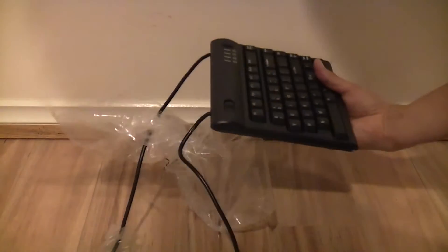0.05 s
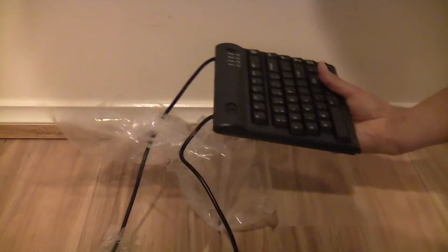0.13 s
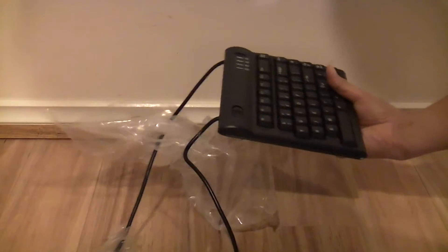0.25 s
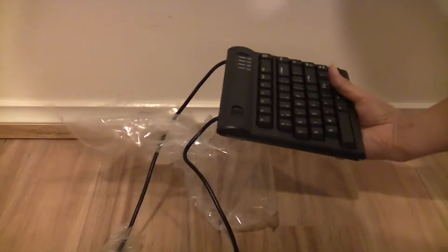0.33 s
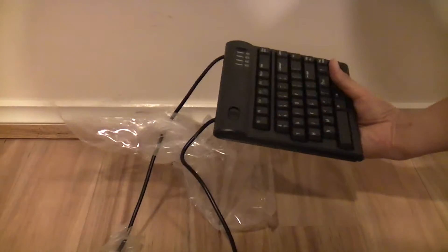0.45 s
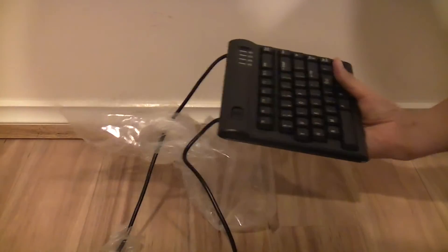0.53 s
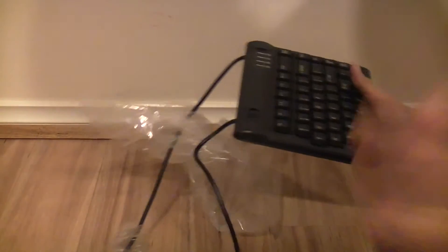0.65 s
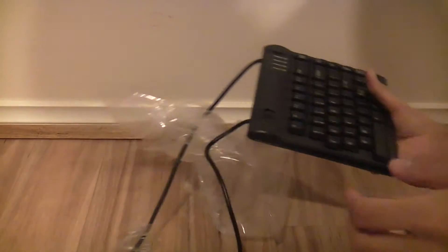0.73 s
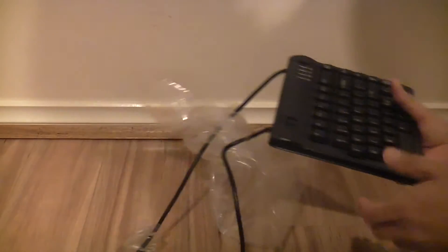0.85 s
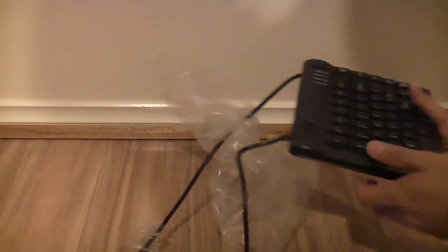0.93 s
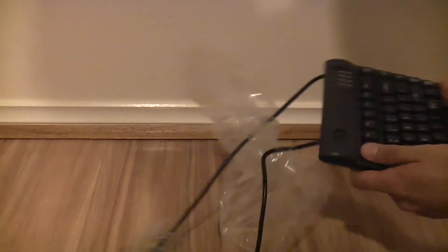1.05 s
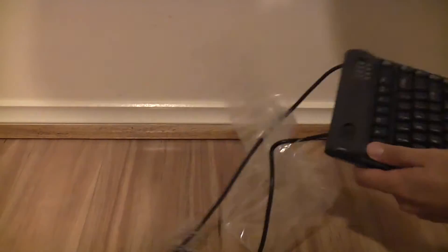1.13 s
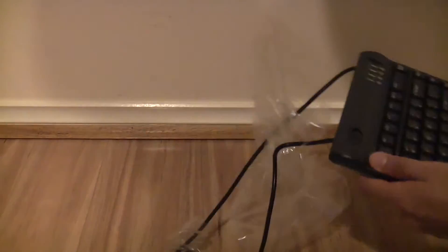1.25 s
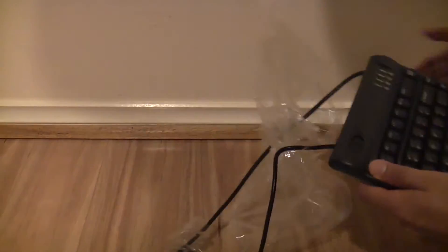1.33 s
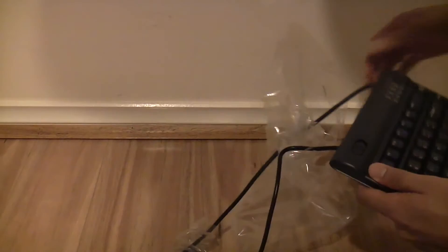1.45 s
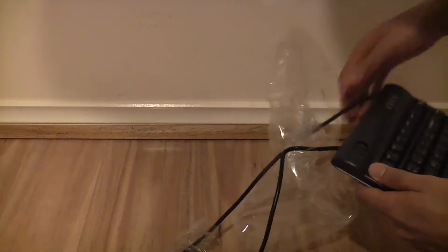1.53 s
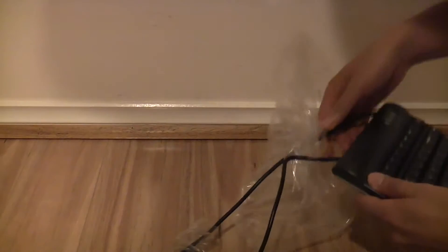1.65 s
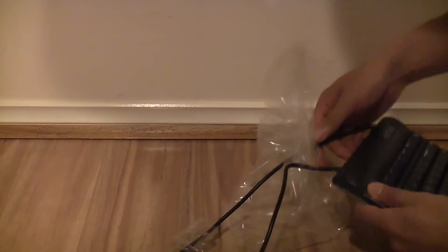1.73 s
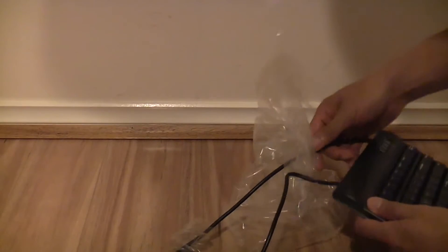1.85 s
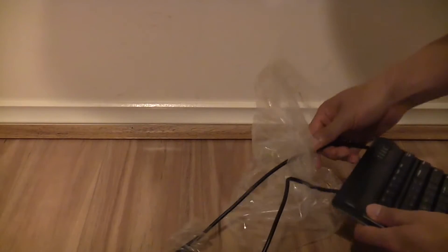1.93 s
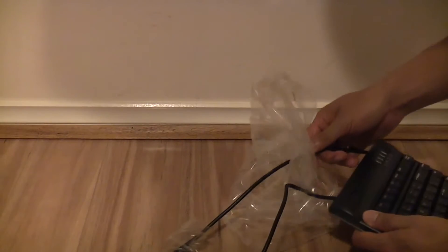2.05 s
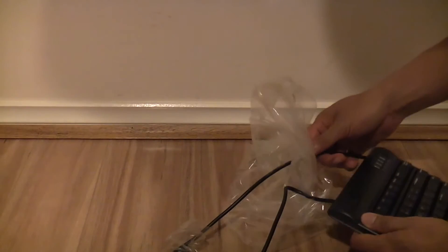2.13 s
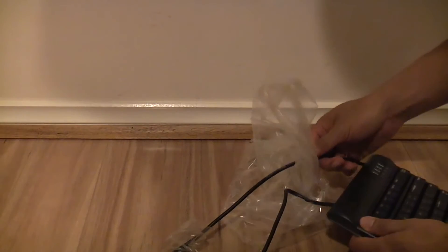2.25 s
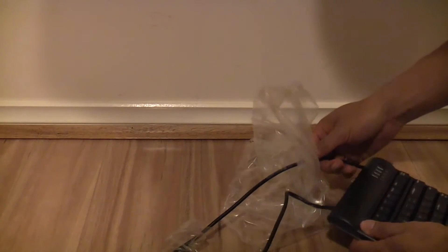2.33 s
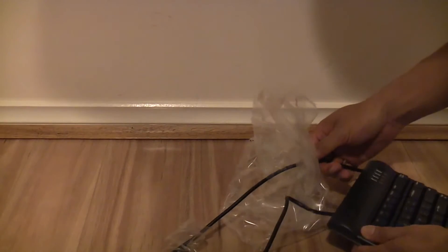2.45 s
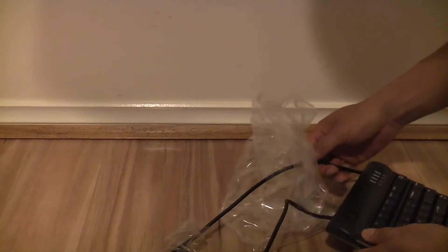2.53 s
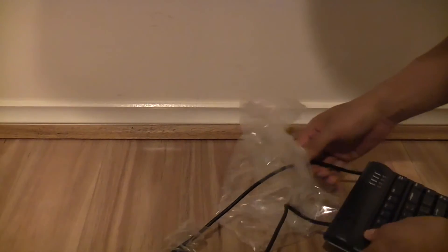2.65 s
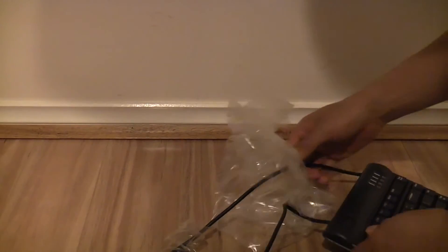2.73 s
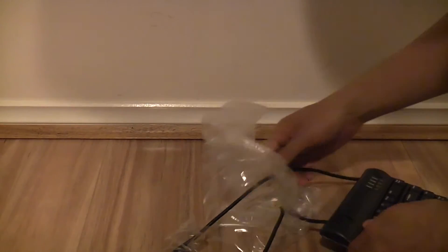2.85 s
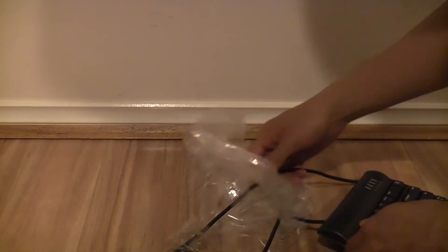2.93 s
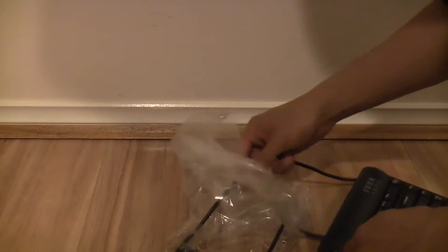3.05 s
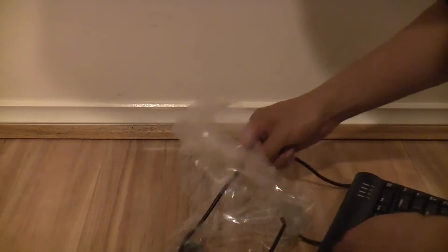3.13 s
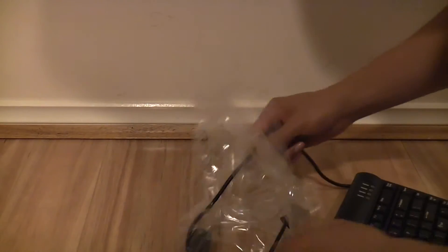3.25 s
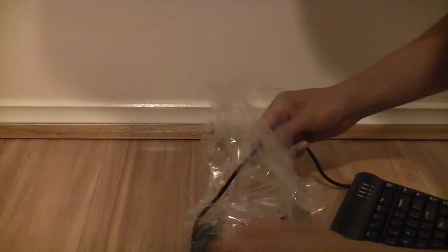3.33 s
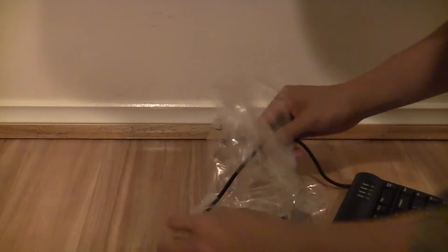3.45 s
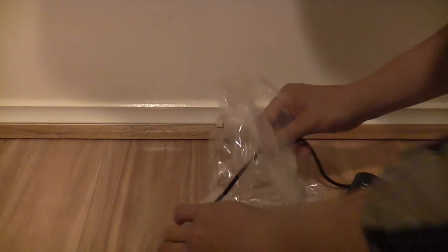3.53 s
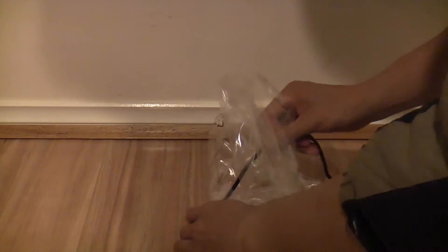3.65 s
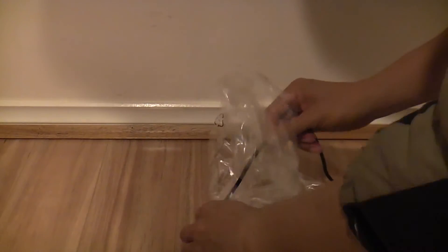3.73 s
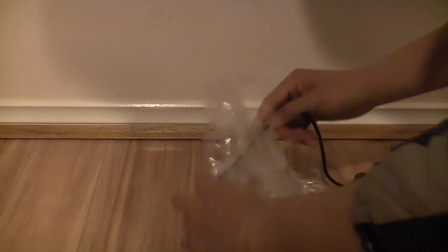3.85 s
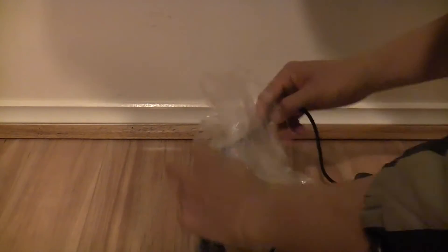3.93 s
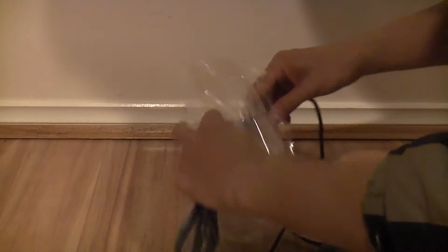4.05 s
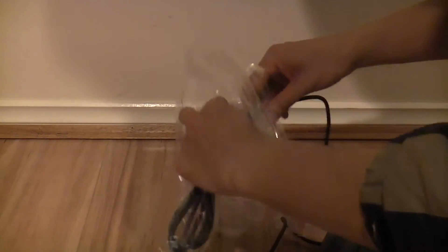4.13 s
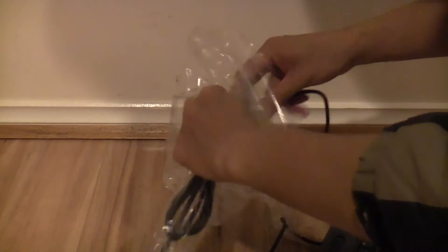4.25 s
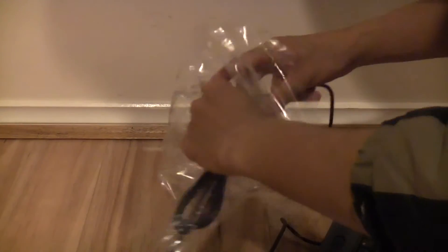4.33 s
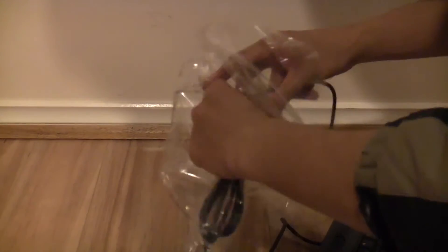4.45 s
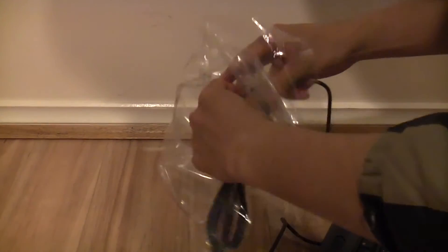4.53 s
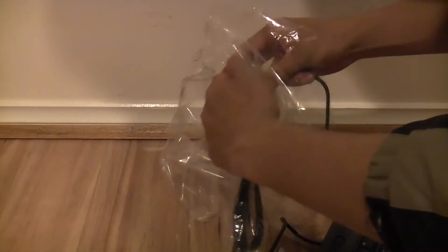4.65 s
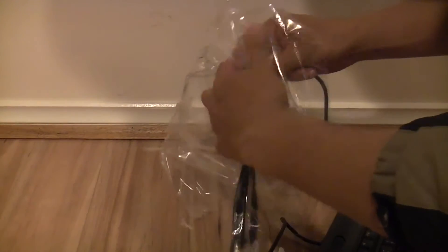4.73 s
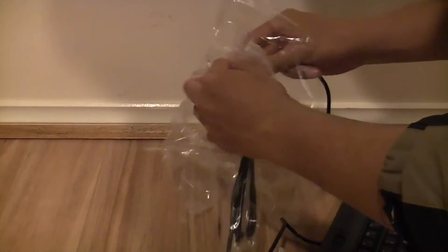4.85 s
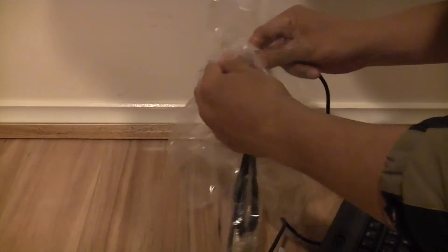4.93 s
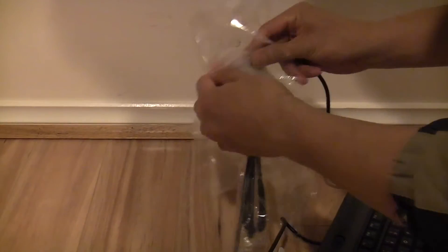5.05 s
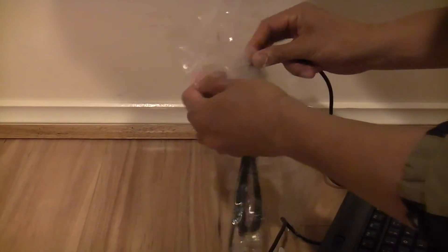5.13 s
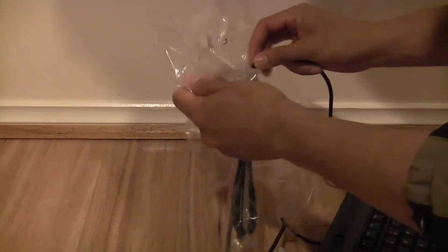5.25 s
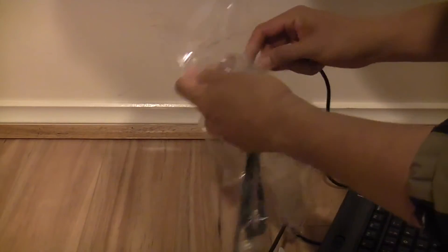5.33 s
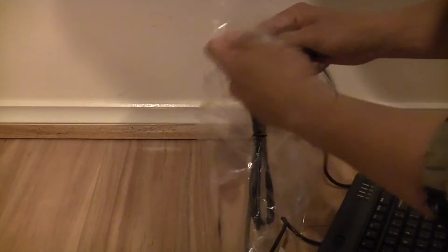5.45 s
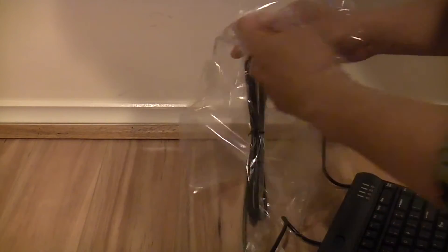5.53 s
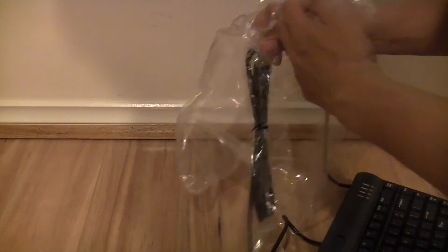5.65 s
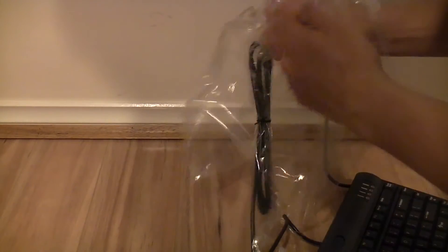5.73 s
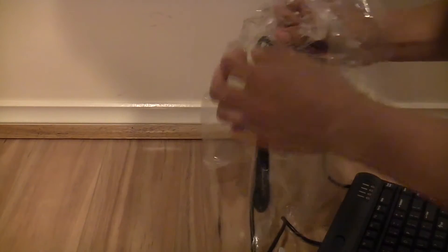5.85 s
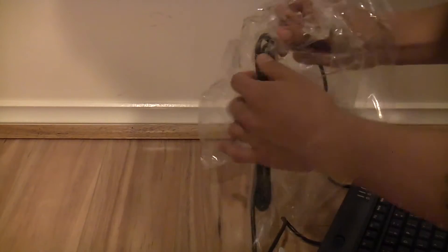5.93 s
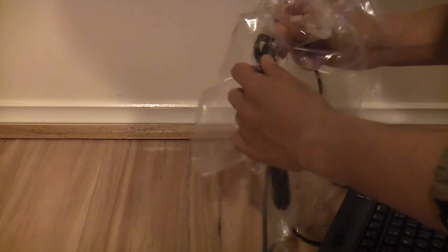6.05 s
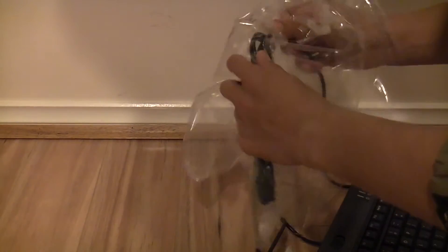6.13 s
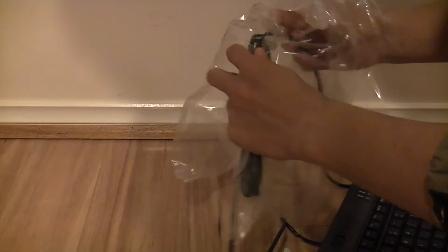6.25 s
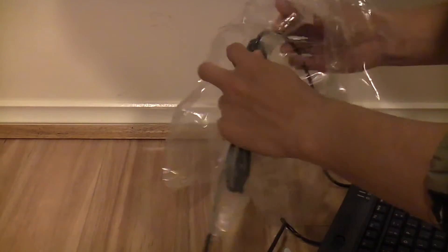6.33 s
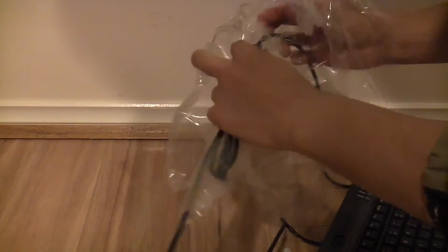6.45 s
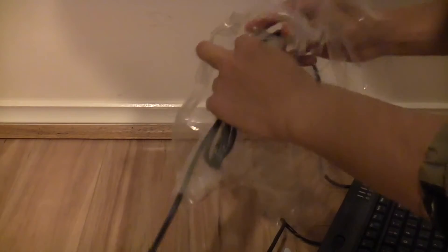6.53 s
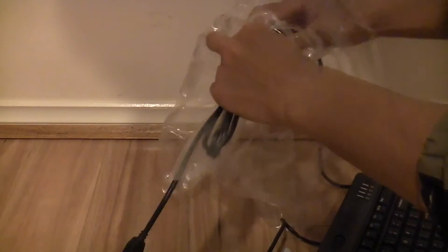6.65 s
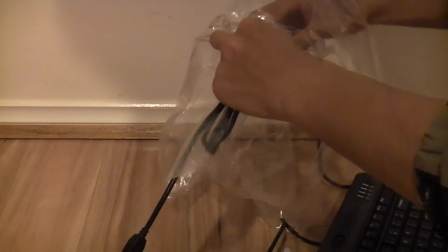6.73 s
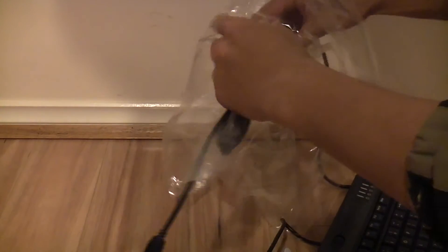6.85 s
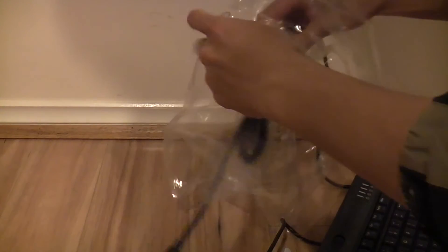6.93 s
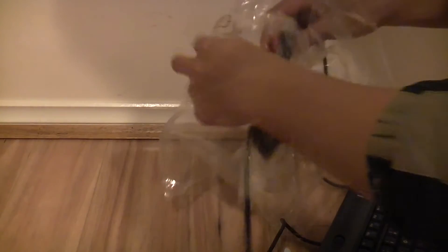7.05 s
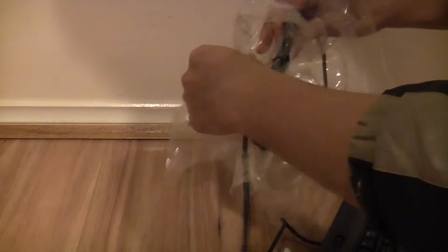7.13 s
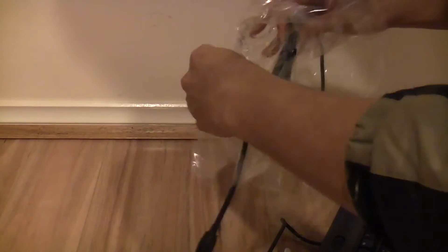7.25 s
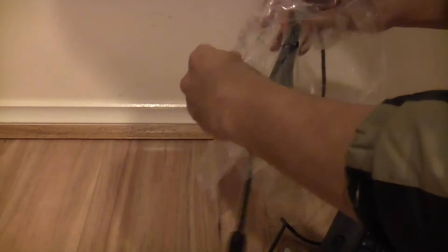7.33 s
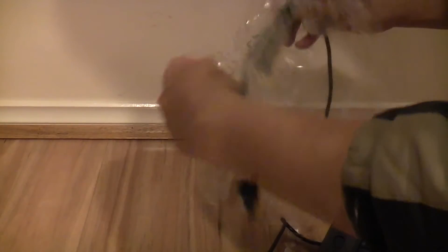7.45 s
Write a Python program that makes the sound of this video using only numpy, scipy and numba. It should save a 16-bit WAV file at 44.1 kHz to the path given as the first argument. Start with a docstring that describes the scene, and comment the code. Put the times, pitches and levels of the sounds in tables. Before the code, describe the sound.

Thin clear film slides and crackles in hands, starting with near silence and light ticks, then bursts of bright crinkle, and finally almost continuous loud rustling. Creases snap crisply and loose panels pat softly. A few plastic knocks land on floorboards, strongest about three seconds in. Indoors, close stereo pickup, brief reflections from a near wall, faint steady hiss beneath.

```python
"""A sleeve brushes softly in a quiet room as a plastic bag starts to slide and tick; then it gets busy. Hands
draw a keyboard cable through the clear film: hiss and showers of tiny ringing folds make its crinkle. Stiff
creases snap and whole panels flap: short bursts of noise, and for the flaps a fading low tone as well. The
keyboard and plug knock on a wooden floor: cracks of noise and sums of fading tones. Room echoes surround all
but the faint steady hiss; the two microphone ports of a nearby camera colour it all."""
import sys
import numpy as np
from scipy import signal
from scipy.fft import rfft, irfft, next_fast_len
from scipy.io import wavfile
from scipy.ndimage import uniform_filter1d, map_coordinates
from numba import njit

SR = 44100
rng = np.random.default_rng(int(sys.argv[2]) if len(sys.argv) > 2 else 0)


def waveform_to_disk(signal):
    """Save audio, clipped to [-1, 1], as 16-bit WAV at the path in sys.argv[1]."""
    frames = np.transpose(np.atleast_2d(signal))
    scaled = np.clip(frames, -1, 1) * 32767
    samples = np.round(scaled).astype(np.int16)
    wavfile.write(sys.argv[1], SR, samples)


N = 330750  # samples: 7.5 s

# All levels in the tables are relative; the functions balance them.
# colour of the still room's hiss: pitch_hz, level_db (per Hz)
QUIET_COLOUR = [(22, -17), (36, -6), (60, -6), (110, -0.5), (450, 6.5), (1200, 2), (4000, -4), (10000, -10),
                (16000, -27)]
# a jacket sleeve brushing as the arm reaches in: time_s, level_db
SLEEVE_LEVEL = [(0, -52), (.3, -59.5), (.6, -70), (.75, -49.5), (.93, -48), (1.08, -59), (1.2, -47),
                (1.36, -86), (1.5, -100)]
# colour of the rubbing cloth: pitch_hz, level_db (per Hz)
CLOTH_COLOUR = [(200, -25), (350, -5), (480, -1), (800, -2.5), (1400, -6.5), (2800, -5), (6000, -10),
                (14000, -32)]
# the bag sliding along the cable between grips: time_s, level_db, slack_db (loose film gives more low folds)
DRAG = [(0, -54.5, -1), (.45, -59.5, -3.5), (1.15, -51, 0.5), (1.4, -74, -4), (1.8, -42.5, 1.5),
        (2.25, -64, 0.5), (2.55, -65, -4), (2.8, -46.5, -0.5), (3.6, -51.5, 2.5), (3.9, -38, 1.5),
        (4.5, -40, -1), (4.75, -35.5, 1), (5.25, -41, -2), (5.7, -31.5, -2.5), (5.91, -48.5, 4.5),
        (6.4, -39.5, 0.5), (6.77, -40, -4), (7.1, -32.5, 1.5), (7.5, -30, -1)]
# fingers squeeze or tug the film: start_s, length_s, level_db, slack_db
GRIPS = [(0.18, 0.059, -57, 5), (0.49, 0.076, -54.5, -8), (1.105, 0.073, -47.5, -0.5),
         (1.675, 0.025, -40.5, -3.5), (1.76, 0.075, -46, 1), (1.95, 0.069, -46, -1),
         (2.143, 0.024, -50.5, 3), (2.31, 0.096, -55, 6.5), (2.617, 0.064, -46, 1),
         (2.845, 0.22, -40.5, -2.5), (3.046, 0.15, -38, 2.5), (3.265, .06, -44.5, 0.5),
         (3.48, 0.069, -48.5, -0.5), (3.669, 0.15, -39, -1.5), (3.769, 0.076, -33.5, -0.5),
         (3.949, 0.12, -38.5, -1.5), (4.07, 0.11, -36, -3), (4.227, 0.05, -33, -0.5),
         (4.311, 0.06, -28.5, -0.5), (4.516, 0.062, -36.5, -2.5), (4.714, .12, -33, -2.5),
         (4.915, 0.041, -35.5, -1), (5.107, .085, -32.5, 0), (5.294, 0.11, -35.5, 1.5),
         (5.382, 0.15, -32, 1.5), (5.557, 0.096, -30.5, 2.5), (5.735, 0.032, -30.5, 0.5),
         (5.968, 0.092, -30.5, 0.5), (6.187, 0.057, -33, -1), (6.326, 0.03, -32.5, -0.5),
         (6.45, 0.22, -34, -1.5), (6.622, 0.057, -35.5, -0.5), (6.808, 0.093, -32, 2.5),
         (6.95, 0.052, -34.5, 4), (7.144, 0.07, -29.5, 0.5), (7.297, 0.045, -31, -2),
         (7.413, 0.071, -29.5, -1.5)]
# colours of treble crackle, middle crumple and low flutter: pitch_hz, level_db (per Hz)
CRACKLE_COLOUR = [(1300, -21.5), (2200, -2.5), (3200, -2), (4400, 0.5), (6300, -3), (8400, -3.5),
                  (10500, -8), (13000, -16), (16000, -22)]
CRUMPLE_COLOUR = [(280, -22), (420, -6.5), (650, -3.5), (1100, 0.5), (1800, 1.5), (2500, -4.5), (3400, -6),
                  (5500, -49.5)]
FLUTTER_COLOUR = [(40, -29), (80, -24), (130, -6.5), (200, -2.5), (320, 3.5), (420, 3), (560, -2),
                  (1100, -55.5)]
# stiff creases that snap through: start_s, level_db, pitch_hz
SNAPS = [(.0752, -31.5, 6150), (.1818, -39.5, 6000), (.281, -36, 5510), (0.3717, -31, 5400),
         (0.705, -38, 1640), (1.1326, -36.5, 3020), (1.1591, -28.5, 3900), (1.4521, -43.5, 3600),
         (1.6247, -36, 3950), (1.667, -28, 4670), (1.6843, -32.5, 3300), (1.7529, -25.5, 5400),
         (1.8044, -25.5, 3700), (1.8702, -25.5, 3200), (1.964, -26, 7000), (2.1157, -31.5, 7400),
         (2.15, -31.5, 3700), (2.1674, -31, 2680), (2.2932, -31.5, 3080), (2.3207, -23, 5100),
         (2.3805, -26, 4800), (2.5352, -42, 3200), (2.592, -37, 2500), (2.5997, -28, 2930),
         (2.6237, -31, 3700), (2.7885, -32.5, 4500), (2.8468, -29, 4800), (2.9779, -24, 3630),
         (3.0296, -29, 3800), (3.2844, -25.5, 6150), (3.512, -28.5, 5000), (3.9262, -23, 6540),
         (4.1336, -23, 5600), (4.7075, -19.5, 4500), (4.7197, -24, 4300), (4.801, -27, 4500),
         (4.8153, -17, 4180), (5.0298, -23.5, 3570), (5.1016, -20, 4400), (5.112, -17.5, 5140),
         (5.122, -22, 5000), (5.1395, -19, 2670), (5.1609, -18.5, 2880), (5.297, -24.5, 3200),
         (5.308, -18.5, 6440), (5.7489, -20, 4800), (5.93, -27.5, 4800), (5.9592, -26.5, 4600),
         (6.403, -20, 4400), (6.6487, -21, 3260), (7.278, -17, 5900), (7.448, -19.5, 5300)]
# keyboard and plug on the floor: start_s, clack_db, clack_pitch_hz, clack_fall_db (per octave, far from the pitch),
# ring_factor (times the ring time; high when no hand damps it), board_db, thud_db
KNOCKS = [(1.2426, -31.5, 1300, 18, 0.86, -33, -62), (2.38, -17.5, 1290, 21, 1.6, -43, -64),
          (2.681, -36, 800, 20, 0.74, -41.5, -54), (3.0548, -14.5, 1830, 11, 1.3, -31.5, -48),
          (3.0562, -22, 825, 33, 1.1, -39, -62), (3.1005, -18.5, 1590, 6.5, 0.63, -29, -49),
          (3.149, -31, 1500, 19, .8, -33.5, -52), (4.6019, -14, 2480, 21, 0.69, -30.5, -74),
          (4.614, -19.5, 2450, 18, 1, -28, -77), (6.201, -32.5, 1130, 35, 1.6, -40, -72)]
# hard plastic ringing against wood: pitch_hz, level_db, t60_s (time to fade 60 dB, before ring_factor)
CASE_MODES = [(720, 6.5, 0.022), (880, 3.5, 0.032), (1033, -0.5, 0.1), (1280, -3, 0.018), (1570, -1, 0.047),
              (1714, -4, 0.034), (2230, 2, 0.02), (2450, 8, 0.023), (2750, 1, 0.03), (3740, 7, 0.012),
              (3900, 8.5, 0.0087), (4800, -27, .012), (5400, -20, .008), (7800, -5, .006)]
# floorboard, then the floor beneath: pitch_hz, level_db, t60_s
BOARD_MODES = [(245, -16, 0.015), (380, -4.5, 0.014), (513, -0.5, 0.02), (570, -5.5, 0.018)]
JOIST_MODES = [(62, 5, 0.23), (84, -11, .25), (133, 9, 0.17), (190, 11, .1)]
# whole panels of the bag popping over: start_s, level_db, pitch_hz
FLAPS = [(2.823, -42, 570), (3.797, -35, 380), (4.014, -37.5, 407), (4.335, -33.5, 400), (5.607, -38, 280),
         (5.762, -34.5, 303), (6.006, -34, 373), (6.375, -33, 207), (6.655, -31.5, 292), (6.878, -35, 200),
         (6.988, -42, 258), (7.157, -31.5, 230), (7.227, -35, 318), (7.34, -39, 335)]
# how well small bodies push the air: pitch_hz, level_db
RADIATION = [(30, -50), (90, -17), (200, -4.5), (380, 0.5), (8500, 0.5), (12000, -5), (16000, -10)]
# fading of the room's echoes: pitch_hz, t60_s
ROOM_FADE = [(150, 0.22), (1200, 0.38), (4000, 0.42), (12000, .24)]
# stereo width of the echoes: pitch_hz, side_db
ECHO_WIDTH = [(60, -6), (130, -1.5), (300, -13), (1100, -7.5), (4000, -7.5), (8300, -5.5), (9700, 0),
              (12000, -5.5), (15000, -6)]
# difference between the microphone ports: pitch_hz, left_minus_right_db
PORTS = [(200, -3), (500, -2.5), (1000, -2), (1600, -0.4), (3300, -0.9), (6300, 0.5), (8200, -1),
         (10000, 0)]

TOP_HZ = 15950  # nothing is kept from here up
GRIP_ATTACK_S, GRIP_RELEASE_S = 0.014, 0.044  # fingers close quickly; time constant of the film relaxing
FIRM_DB = -31  # effort of a firm grip, the reference for the balances below
# Broad folds against the crackle in a firm grip; their dB per dB of effort.
CRUMPLE_DB, CRUMPLE_GROWS = -6.5, 0.79
# The same for the loose sheet; then its dB per dB of slack.
FLUTTER_DB, FLUTTER_GROWS, FLUTTER_PER_SLACK = -15.5, 0.78, 1.8
# Hiss against folds in a firm grip; its rise per dB of less effort: a light touch slides without buckling.
SLIDE_DB, SLIDE_SMOOTHS = -4.5, 0.12
# Lesser snaps: how many a second, level over the effort, scatter either way, typical pitch.
STRAY_PER_S, STRAY_DB, STRAY_SCATTER_DB, STRAY_HZ = 9.5, 2, 2.5, 4800


def amp(db):
    """Turn decibels into gain."""
    return 10 ** (np.asarray(db) / 20)


def unit(x):
    """Scale to rms (average strength) 1."""
    return x / np.sqrt(np.mean(x ** 2) + 1e-20)


def along(points, hz):
    """Read a curve of (pitch_hz, value) points on a log pitch axis."""
    f, v = np.transpose(points)
    return np.interp(np.log(hz + 1), np.log(f), v)


def filtered(x, response):
    """Multiply the spectrum of x by a response of pitch."""
    n = x.shape[-1]
    padded = next_fast_len(n + SR // 10)
    spectrum = rfft(x, padded) * response(np.fft.rfftfreq(padded, 1 / SR))
    return irfft(spectrum, padded)[..., :n]


def coloured(x, level_db, size=2048):
    """Filter with a dB curve, never sounding ahead of the input, so that attacks stay sharp."""
    gain = amp(level_db(np.fft.rfftfreq(size, 1 / SR))) + 1e-6
    # Folding the cepstrum (spectrum of the log spectrum) packs the response at its start.
    cepstrum = irfft(np.log(gain))
    cepstrum[1:size // 2] *= 2
    cepstrum[size // 2 + 1:] = 0
    response = irfft(np.exp(rfft(cepstrum)))
    return signal.fftconvolve(x, response)[:len(x)]


def hump(hz, centre_hz, fall_db):
    """A broad hill in dB whose far flanks fall by fall_db an octave."""
    octaves = np.log2((hz + 1) / centre_hz)
    return -fall_db * (np.sqrt(1 + octaves ** 2) - 1)


def burst(x, seconds):
    """Scale a blow as if all its energy had rms 1 over so many seconds."""
    return x / np.sqrt(np.sum(x ** 2) / (seconds * SR))


def add(track, s, sound):
    """Lay a sound into a track at time s."""
    part = track[round(s * SR):][:len(sound)]
    part += sound[:len(part)]


def wobble(rate):
    """A smooth random curve with so many knots a second."""
    knots = rng.standard_normal(int(N * rate / SR) + 4)
    return map_coordinates(knots, [np.arange(N) * rate / SR])


@njit
def rings(starts, step, cycles, size, n):
    """Sum of fading sines; starts in samples, step in cycles a sample."""
    out = np.zeros(n)
    for k in range(len(starts)):
        # Each sample turns and shrinks the complex number z a little.
        turn = np.exp(step[k] * complex(-1 / cycles, 2 * np.pi))
        z = complex(size[k], 0)
        for i in range(int(starts[k]), min(n, int(starts[k] + 5 * cycles / step[k]))):
            out[i] += z.imag
            z *= turn
    return out


def folds(rate, scatter_db, clump_s, count=3):
    """Times and sizes of tiny slips or folds in clumps: one that gives way sets off its neighbours."""
    n = int(rate * N / SR)
    first = rng.uniform(0, N / SR, (n, 1))
    times = first + clump_s * rng.exponential(size=(n, count))
    strength = rng.standard_normal((n, 1)) + rng.standard_normal((n, count))
    strength = np.clip(strength, -4, 2.8)
    return times.ravel(), amp(scatter_db * strength).ravel()


def shower(times, sizes, low_hz, high_hz, cycles, spread_s, detune=.22, count=5):
    """Every fold has its own pitch and rings a few facets around it, each a moment late."""
    shape = (len(times), count)
    place = (rng.random((len(times), 1)) + detune * rng.standard_normal(shape)) % 1
    hz = low_hz * (high_hz / low_hz) ** place
    # High bending waves run ahead.
    delay = spread_s * rng.exponential(size=shape) * np.sqrt(low_hz / hz)
    starts = times[:, None] + delay
    size = sizes[:, None] * hz * rng.choice([-1, 1], shape)
    step = np.minimum(hz.ravel() / SR, .45)
    return unit(rings(starts.ravel() * SR, step, cycles, size.ravel(), N))


def film(grains, spectrum, slide_db):
    """Grains over the hiss of sliding surfaces, in the colour of the material."""
    slide = amp(slide_db)
    mix = (grains + slide * rng.standard_normal(N)) / np.hypot(1, slide)
    return unit(coloured(mix, lambda hz: along(spectrum, hz)))


def still_room(level_db):
    """Faint steady air and microphone hiss: coloured noise, a little different on each side."""
    noise = rng.standard_normal((2, N))
    mid, side = unit(filtered(noise, lambda hz: amp(along(QUIET_COLOUR, hz))))
    return amp(level_db) * np.array([mid + side / 2, mid - side / 2])


def sleeve():
    """Cloth sticks and slips in dense, soft grains as the arm moves."""
    times, sizes = folds(rate=200, scatter_db=5, clump_s=.004)
    slips = shower(times, sizes, 315, 2540, cycles=1.6, spread_s=0.00202)
    level_db = np.interp(np.arange(N) / SR, *np.transpose(SLEEVE_LEVEL)) - 2.5
    return amp(level_db) * film(slips, CLOTH_COLOUR, slide_db=6)


def handling(count=7500):
    """Effort and slack of the film in dB: each grip rises, holds and relaxes on top of the drag."""
    t = np.linspace(0, N / SR, count)
    drag_s, drag_db, drag_slack_db = np.transpose(DRAG)
    power = amp(np.interp(t, drag_s, drag_db)) ** 2
    # Slack is averaged, each part weighing as much as its power.
    weighted_slack = power * np.interp(t, drag_s, drag_slack_db)
    for s, length, db, slack_db in GRIPS:
        closing = np.clip((t - s) / GRIP_ATTACK_S + .5, 0, 1)
        relaxing = np.exp(-np.maximum(t - s - length, 0) / GRIP_RELEASE_S)
        grip = (amp(db) * closing * relaxing) ** 2
        power += grip
        weighted_slack += slack_db * grip
    curves = (10 * np.log10(power), weighted_slack / power)
    return [np.interp(np.arange(N) / SR, t, curve) for curve in curves]


def sharpened(x, effort_db, bright=0.066, wander_db=3.5, edge_hz=9000):
    """A sudden squeeze makes tighter creases with more top; the sharpness also wanders at random."""
    top = filtered(x, lambda hz: 1 / (1 + (edge_hz / (hz + 1)) ** 4))
    squeeze_db = effort_db - uniform_filter1d(effort_db, SR // 2)  # against its half-second average
    top_db = bright * squeeze_db + wander_db * wobble(rate=32)
    return x + top * (amp(top_db) - 1)


def crinkle(effort_db, slack_db):
    """The same folds crackle high and crumple in the middle; the loose sheet flutters beneath."""
    # The lower layers grow more slowly than the crackle, so more effort is brighter.
    over_firm_db = effort_db - FIRM_DB
    crumple_db = FIRM_DB + CRUMPLE_DB + CRUMPLE_GROWS * over_firm_db + slack_db
    flutter_db = FIRM_DB + FLUTTER_DB + FLUTTER_GROWS * over_firm_db + FLUTTER_PER_SLACK * slack_db

    times, sizes = folds(rate=320, scatter_db=4.0, clump_s=.0018)
    ticks = shower(times, sizes, 1800, 17000, cycles=1.85, spread_s=.0006)
    crackle = film(ticks, CRACKLE_COLOUR, SLIDE_DB - SLIDE_SMOOTHS * over_firm_db)
    broad_folds = shower(times, sizes, 406, 3620, cycles=1.63, spread_s=0.001198)
    crumple = film(broad_folds, CRUMPLE_COLOUR, slide_db=-6.5)
    sheet_folds = shower(times, sizes, 94, 700, cycles=0.99, spread_s=.002)
    flutter = film(sheet_folds, FLUTTER_COLOUR, slide_db=-16)

    bright_crackle = amp(effort_db) * sharpened(crackle, effort_db)
    return bright_crackle + amp(crumple_db) * crumple + amp(flutter_db) * flutter


def pop(hz, fall_db, t60, size=4096):
    """A burst of crowded modes round one pitch, made of quickly fading noise."""
    t = np.arange(size) / SR
    noise = rng.standard_normal(size) * amp(-60 * t / t60)
    return coloured(noise, lambda f: hump(f, hz, fall_db))


def snaps(creases):
    """A crease snaps with a sharp edge and a bright tick; its slower, lower bending waves trail behind."""
    out = np.zeros(N)
    for s, db, hz in creases:
        edge = burst(pop(hz, fall_db=3.5, t60=0.0018), 0.001)
        tick = burst(pop(hz, fall_db=14.5, t60=0.011), 0.0016)
        trail = burst(pop(hz / 2, fall_db=9.0, t60=0.034), 0.0028)
        add(out, s, amp(db - 11) * edge)
        add(out, s, amp(db - 2.0) * tick)
        add(out, s + 0.001352, amp(db - 12.0) * trail)
    return out


def stray_snaps(effort_db):
    """Lesser snaps at random moments, as strong as the film is worked."""
    creases = []
    for when, size, pitch in rng.random((int(STRAY_PER_S * N / SR), 3)):
        level_db = effort_db[int(when * N)] + STRAY_DB + STRAY_SCATTER_DB * (2 * size - 1)
        creases.append((when * N / SR, level_db, STRAY_HZ * 2 ** (pitch - .5)))
    return creases


def radiated(x):
    """Small bodies move little air in the bass, and their contacts are not perfectly sharp."""
    return coloured(x, lambda hz: along(RADIATION, hz), size=4096)


def struck(modes, weight_db=lambda hz: 0, ring=1):
    """A struck body rings in several fading tones, at slightly new strengths for each blow."""
    t = np.arange(SR // 3) / SR
    out = np.zeros(len(t))
    for hz, db, t60 in modes:
        sign = rng.choice([-1, 1])
        level_db = db + weight_db(hz) + rng.normal(0, 2.1) - 60 * t / (ring * t60)
        out += sign * amp(level_db) * np.sin(2 * np.pi * hz * t + rng.uniform(-0.095, 1.0))
    return out


def knocks():
    """Hard plastic meets the floor: a crack, the ring of the case, the board and a dull thud."""
    clacks, boards, thuds = np.zeros((3, N))
    for s, db, hz, fall_db, ring, board_db, thud_db in KNOCKS:
        crack = burst(pop(hz, fall_db, t60=0.018), 0.002)
        case = burst(struck(CASE_MODES, lambda f: hump(f, hz, fall_db), ring), 0.0021)
        add(clacks, s, amp(db - 0.5) * crack)
        add(clacks, s, amp(db - 4.5) * case)
        add(boards, s, amp(board_db) * burst(struck(BOARD_MODES), 0.0037))
        add(thuds, s, amp(thud_db) * burst(struck(JOIST_MODES), 0.014))
    # The case is too small for low notes.
    clacks = coloured(clacks, lambda hz: along([(150, -17), (400, -2), (650, 1)], hz))
    return radiated(clacks + boards) + thuds


def flaps():
    """A panel pops over and pushes the air: a soft, hollow pat."""
    out, t = np.zeros(N), np.arange(SR // 10) / SR
    for s, db, hz in FLAPS:
        push = np.sin(2 * np.pi * hz * t) * amp(-7 * hz * t)
        rustle = pop(hz, fall_db=27, t60=0.027, size=len(t))
        pat = burst(push, 0.0079) + 1.07 * burst(rustle, 0.018)
        add(out, s, amp(db - 7.5) * pat)
    return out


def room_tail(gap_s):
    """Mid and side echoes: the near wall answers first, then noise that fades by pitch."""
    hz, t, z = signal.stft(rng.standard_normal((2, SR // 2)), SR, nperseg=256)
    fade = amp(-60 * t / along(ROOM_FADE, hz)[:, None])
    tail = signal.istft(z * fade, SR, nperseg=256)[1]
    tail /= np.linalg.norm(tail[0])
    tail[0, 0] += .3  # the near wall
    tail[1] = filtered(tail[1], lambda f: amp(along(ECHO_WIDTH, f)))
    return np.pad(tail, ((0, 0), (round(gap_s * SR), 0)))


def in_room(x, wet_db, pan_db, wide_db=0, count=7):
    """Direct sound and echoes; the source hops among spots that each have echoes of their own."""
    hops = np.arange(0, N, SR // 160)  # every few milliseconds
    spots = rng.integers(count, size=len(hops))
    echo = np.zeros((2, N))
    for k in range(count):
        share = np.sqrt(np.interp(np.arange(N), hops, spots == k))
        echo += signal.fftconvolve((share * x)[None], room_tail(gap_s=.0102), axes=1)[:, :N]
    mid, side = echo[0], amp(wide_db) * echo[1]
    pan = amp([[pan_db / 2], [-pan_db / 2]])  # positive leans left
    return pan * (x + amp(wet_db) * np.array([mid + side, mid - side]))


def scene():
    """The bag is in front, the arm off to the right; the knocks come off the floor."""
    effort_db, slack_db = handling()
    pops = radiated(snaps(SNAPS + stray_snaps(effort_db)) + flaps())
    bag = in_room(amp(-2.0) * crinkle(effort_db, slack_db) + pops, wet_db=-3.5, pan_db=1.0)
    arm = in_room(sleeve(), wet_db=-3.5, pan_db=-2.5, wide_db=8.5, count=2)
    floor = in_room(knocks(), wet_db=-4.5, pan_db=0.9, wide_db=0.0, count=3)
    return bag + arm + floor + still_room(level_db=-56.0)


def record(dry):
    """The camera's two ports differ a little in colour; both have a narrow treble notch and a band limit."""
    def response(hz):
        lean = amp(np.array([[.5], [-.5]]) * along(PORTS, hz))
        notch = amp(-5 / (1 + ((hz - 9380) / 160) ** 2))
        return lean * notch * (hz < TOP_HZ)
    return filtered(dry, response)


dry = scene()
out = record(dry)
waveform_to_disk(out)
```